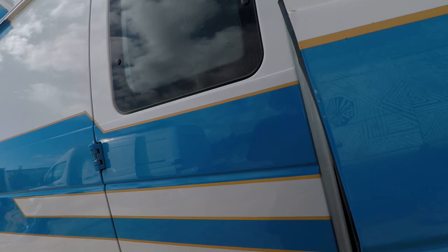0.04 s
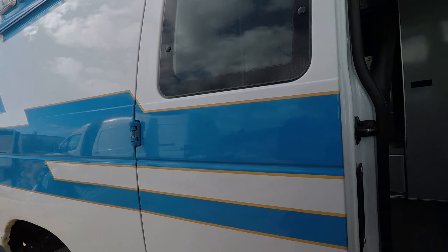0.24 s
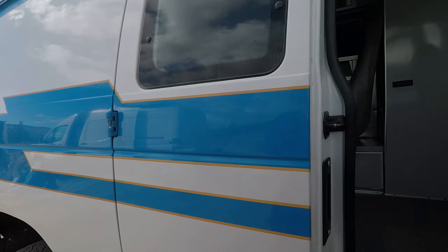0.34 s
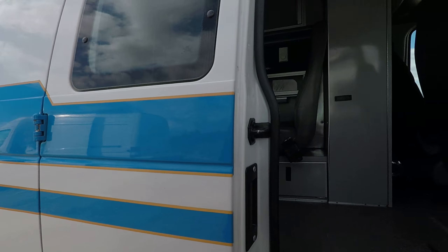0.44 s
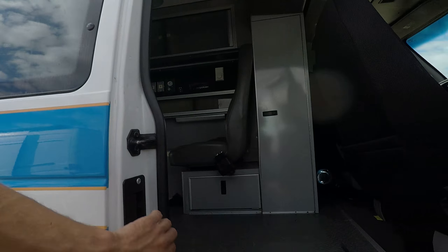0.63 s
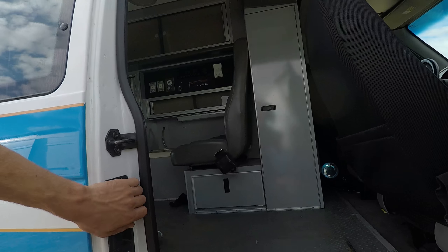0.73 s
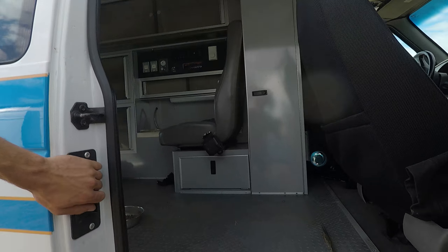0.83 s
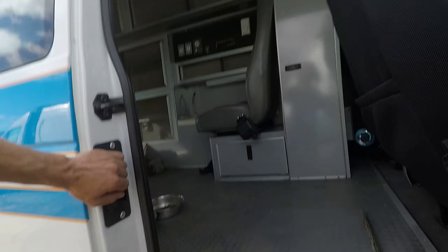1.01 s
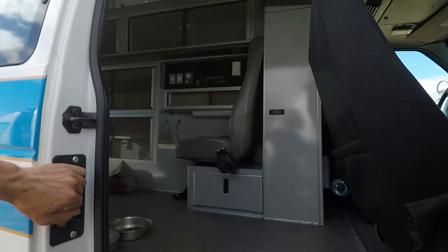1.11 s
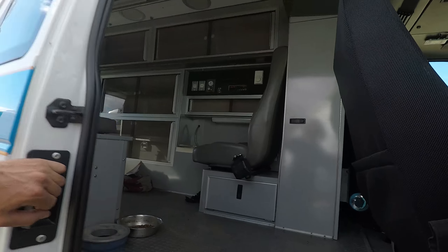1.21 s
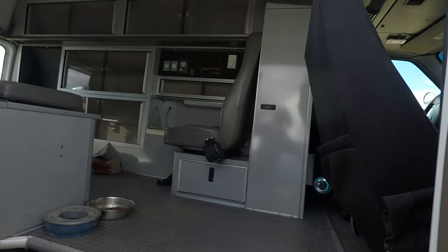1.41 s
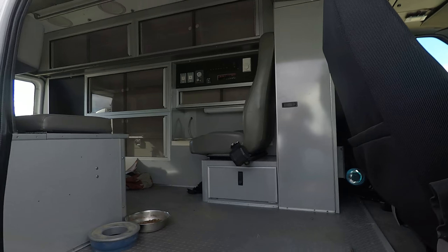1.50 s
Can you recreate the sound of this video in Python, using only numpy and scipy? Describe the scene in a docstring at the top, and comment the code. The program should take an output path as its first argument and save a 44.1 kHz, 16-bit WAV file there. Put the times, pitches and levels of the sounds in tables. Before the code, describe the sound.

Van side doors unlatched: a sharp metallic clack and boom, then a heavier latch clunk and hum

```python
"""Low outdoor rumble, a high hiss and small scrapes come first, with air puffing on the microphone.
Then the first of a van's twin side doors clacks and booms, heard from arm's length. A hand knocks and scrapes
at the handle of the second, whose latch lets go with a clunk that leaves the panel humming.
Metal and panels are decaying modes plus dense bands of noise; air and scrapes are coloured noise."""
import sys
import numpy as np
from scipy import signal
from scipy.fft import rfft, irfft
from scipy.io import wavfile

SR = 44100
rng = np.random.default_rng(int(sys.argv[2]) if len(sys.argv) > 2 else 0)


def int16_out(signal):
    """Quantize to a 16-bit WAV file."""
    q = np.round(np.clip(np.atleast_2d(signal).T, -1, 1) * 32767)
    wavfile.write(sys.argv[1], SR, q.astype(np.int16))


N = 68355
T = np.arange(N) / SR
TOP_HZ = 15000

# octave_db is the level in each octave band; relative_db scales the sounds it is applied to

# puffs of air on the microphone: peak_s, width_s, pitch_hz, level_db
PUFFS = [(0.102, 0.016, 38.4, -28), (0.223, 0.01, 45, -17), (0.565, 0.015, 35.8, -15),
         (0.674, 0.028, 47, -23), (0.817, 0.015, 37.4, -23.5), (0.924, 0.082, 42.2, -20),
         (1.009, 0.016, 71.3, -8), (1.033, 0.021, 33, -6.5), (1.037, 0.031, 118, -19),
         (1.076, 0.015, 23, -9)]
# outdoor rumble, spectrum: freq_hz, octave_db
OUTDOORS = [(22, -27.5), (40, -36), (80, -40), (170, -37.5), (320, -46.5), (640, -53), (1300, -56),
            (2300, -61.5), (3300, -69), (6000, -61), (10500, -60), (14000, -72)]
# outdoor rumble, gain over time: time_s, relative_db
OUTDOORS_LEVEL = [(0, 0.5), (.4, 1.5), (.6, -0.5), (.95, 2), (1.25, 1), (1.42, -8.5), (1.55, -1.5)]
# high hiss, spectrum: freq_hz, octave_db
HISS = [(400, -17), (1000, -24), (2000, -24), (2600, -9), (3450, -17.5), (4200, -8), (4750, 1.5),
        (5400, -0.5), (6100, 1), (6600, 1), (7300, -16.5), (8800, -5.5), (11200, -20), (12400, -10),
        (15000, -26)]
# high hiss, gain over time: time_s, relative_db
HISS_LEVEL = [(0, -46), (.07, -60), (.112, -44), (.15, -62), (.18, -64), (.22, -42), (.31, -50.5),
              (.35, -43), (.55, -46.5), (.63, -54.5), (1.02, -55), (1.09, -44.5), (1.2, -52.5), (1.27, -63),
              (1.32, -48.5), (1.4, -49), (1.55, -52)]
# thin whistle in the hiss as the first door swings; WHISTLE_HZ is its pitch at the start
WHISTLE_S, WHISTLE_LENGTH_S, WHISTLE_DB = 0.29, 0.31, -46
WHISTLE_HZ, WHISTLE_WIDTH_HZ, WHISTLE_GLIDE_HZ_PER_S = 6620, 560, -1000

# scrapes of hand and handle: start_s, length_s, relative_db
SCRAPES = [(0.004, 0.014, -45), (0.092, 0.042, -44.5), (0.73, 0.043, -47.5), (0.807, 0.0089, -44.5),
           (0.882, 0.064, -39.5), (1.039, 0.035, -32.5)]
# scrape spectrum: freq_hz, octave_db
SCRAPE_COLOUR = [(300, -2.5), (700, -4.5), (1300, -6.5), (2200, 1), (3300, -8.5), (5500, 5), (8000, -14),
                 (11000, -22), (14000, -17)]
SCRAPE_GRAINS_PER_S, SCRAPE_GRAIN_DB = 400, 3
# faint squeak of the handle's pivot
SQUEAK_S, SQUEAK_LENGTH_S, SQUEAK_HZ, SQUEAK_WIDTH_HZ, SQUEAK_DB = 0.715, 0.28, 1127, 310, -51.5
SQUEAK_CATCH_PER_S, SQUEAK_CATCH_DB = 60, 5
# loose steel parts under the scrapes; RATTLE_DB is relative to SCRAPES
RATTLE_PER_S, RATTLE_DB, RATTLE_SPREAD_DB, RATTLE_T60_S = 170, 15, 1, 0.017

# dull bumps of the bodywork: start_s, pitch_hz, level_db, t60_s
BUMPS = [(0.285, 255.9, -10, 0.3), (.585, 180, -25.5, 0.5), (.646, 189.3, -18, 0.15),
         (.646, 256.8, -27, 0.37), (0.644, 440, -29.5, 0.13), (0.743, 187.4, -20.5, 0.23),
         (.75, 409, -36, 0.21), (0.802, 124.4, -13, 0.12), (0.899, 113, -21.5, 0.12),
         (1.168, 255.7, -20.5, 0.16)]
BUMP_RISE_S = 0.0077
# light ticks of the handle and hinge: start_s, relative_db
TICKS = [(0.647, 2), (0.736, 3), (.755, -4), (0.788, -5.5), (0.84, -20), (0.963, -5), (1.312, -7.5),
         (1.343, -9.5)]
# dense ring of a tick: freq_hz, octave_db, t60_s
TICK_RING = [(397.5, -34.5, 0.2), (780, -49, 0.071), (1530, -37.5, 0.051), (3200, -62, 0.048),
             (5340, -46, 0.15), (11000, -83, 0.046)]
# modes of the handle, rung by every tick: pitch_hz, level_db, t60_s
HANDLE_MODES = [(995, -43.5, 0.069), (1232, -44, 0.065), (1430, -45.5, 0.045), (1680, -45, 0.056),
                (2110, -50, 0.066)]
# dull scuff of a foot: start_s, length_s, level_db
SCUFFS = [(0.065, 0.073, -38)]
SCUFF_HZ, SCUFF_WIDTH_HZ = 372, 200
# rustle as the second door swings out; SWING_DB scales its spectrum
SWING_S, SWING_LENGTH_S, SWING_DB = 1.29, 0.26, -56.5
# rustle spectrum: freq_hz, octave_db
SWING_COLOUR = [(150, -2), (400, 4.5), (900, 0), (2000, 2.5), (3400, -6.5), (5000, 3), (12000, -17)]

# modes of the first door's steel catch, shared by the loose parts: pitch_hz, level_db, t60_s
CATCH = [(4180, -25, 0.048), (5120, -22, 0.06), (5930, -30, 0.096), (6240, -19.5, 0.087),
         (6400, -29, 0.069), (6980, -32, 0.057), (7370, -27.5, 0.075), (8200, -36, 0.12),
         (8440, -37, 0.057)]
CATCH_DETUNE = 0.022  # largest pitch shift, as a fraction: each contact grips the catch elsewhere
# brief high metallic noise swelling into the first clacks; SWELL_IN_DB scales its bands
SWELL_IN_PEAK_S, SWELL_IN_DB, SWELL_IN_RISE_DB_PER_S, SWELL_IN_FALL_DB_PER_S = 0.2365, -8, 808, 2000
SWELL_IN_WIDTH_HZ, SWELL_IN_PITCH_HZ, SWELL_IN_FAVOUR_DB = 170, 6130, 1

# metal contacts of the first door: start_s, relative_db
FIRST_CLACKS = [(.2322, -6.5), (0.2352, 1), (.2425, -8), (.251, -13.5)]
# crack of each contact: freq_hz, octave_db, t60_s
FIRST_CRACK = [(290, -24.5, 0.037), (700, -21.5, 0.14), (2110, -18.5, 0.048), (2960, -15.5, 0.024),
               (5060, -20.5, 0.1), (7280, -11.5, 0.042), (10100, -35, 0.017), (13600, -18, 0.017)]
# blows on the panel, the jolt and its soft rebound on the seal: start_s, relative_db, push_s, lowpass_hz
FIRST_BLOWS = [(0.2372, -1, 0.0044, 12100), (0.3146, -7, 0.0011, 454)]
# modes of the panel: pitch_hz, level_db, t60_s
FIRST_PANEL = [(94.2, -14, 0.46), (133.8, -10, 0.72), (158.2, -7.5, 0.25), (172.6, -7.5, 0.42),
               (255, -15.5, 0.3), (316.3, -15.5, 0.25), (415, -21.5, 0.36), (437.5, -19, 0.43),
               (481, -21, 0.49), (553, -20.5, 0.41), (587.4, -32.5, 0.68), (626, -27, 0.34),
               (676, -35, 0.22), (779, -26, 0.46), (1203, -25.5, 0.22), (1500, -30.5, 0.26),
               (1825, -17, 0.081), (2090, -11.5, 0.05), (2265, -30, 0.18)]
# dense ring of the door: freq_hz, octave_db, t60_s
FIRST_BODY = [(70, -34, 0.29), (141, -26, 0.49), (294, -17, 0.51), (540, -16, 0.36), (1130, -26.5, 0.35),
              (2190, -23.5, 0.16), (3200, -36.5, 0.24), (6030, -28.5, 0.27), (11000, -59, 0.21)]

# metal contacts of the second door's latch: start_s, relative_db
LATCH_CLACKS = [(0.999, -13), (1.105, -9), (1.1097, 3), (1.1155, -0.5), (1.122, -6.5), (1.1445, -2),
                (1.151, -8), (1.173, -15), (1.2118, -24)]
# crack of each contact: freq_hz, octave_db, t60_s
LATCH_CRACK = [(296, -22, 0.046), (780, -24, 0.042), (2020, -39, 0.047), (3230, -39, 0.05),
               (4870, -27.5, 0.079), (6960, -30, 0.11), (8700, -37, 0.048), (11000, -56, .08),
               (14000, -54, .08)]
# blows on the second door, the hand, then the latch letting go: start_s, relative_db, push_s
SECOND_BLOWS = [(0.646, -30, 0.0017), (.739, -21, 0.0007), (.757, -28, 0.0055), (0.905, -29.5, 0.0029),
                (1.1066, 2, 0.0021), (1.142, -6, 0.0096), (1.172, -20, 0.0052)]
# modes of the panel: pitch_hz, level_db, t60_s
SECOND_PANEL = [(124.6, -13.5, 0.26), (149.3, -1.5, 0.23), (190.1, -6.5, 0.39), (266, -31, 0.1),
                (321.5, -16.5, 0.15), (379.4, -10, 0.13), (437, -29, 0.28), (707.6, -21, 0.11),
                (832.3, -20, 0.13), (1182, -22.5, 0.13), (1298, -34, 0.15), (1633, -46, 0.22),
                (1997, -28.5, 0.1)]
# dense ring of the door: freq_hz, octave_db, t60_s
SECOND_BODY = [(71, -24, 0.26), (152, -20.5, 0.72), (307, -16, 0.34), (560, -26.5, 0.32),
               (1180, -24.5, 0.21), (2400, -26, 0.16), (3250, -44, 0.12), (5900, -32, 0.15),
               (11000, -63, 0.19)]
# slow hum after the clunk, two beating modes: pitch_hz, level_db, t60_s
HUM = [(192.8, 8, 0.33), (178.2, 6.5, 0.29)]
HUM_S, HUM_RISE_S = 1.125, 0.12
# time a panel needs to get moving at SWELL_HZ, in inverse proportion to pitch
FIRST_SWELL_S, SECOND_SWELL_S, SWELL_HZ = 0.0021, 0.0037, 151

# the two microphone ports differ only in the top treble: freq_hz, side_minus_mid_db
PORTS = [(400, -88), (5000, -64), (8000, -55), (10500, -21), (12500, -3.5), (15000, 0)]
PORT_PHASE_RAD = 1.65


def amp(db):
    """Amplitude from decibels."""
    return 10 ** (np.asarray(db) / 20)


def along(table, hz, axis=1):
    """A column of a table by frequency, joined on a log axis."""
    rows = np.array(table, float)
    return np.interp(np.log(hz), np.log(rows[:, 0]), rows[:, axis])


def curve(table):
    """Gain over time from time_s, relative_db points."""
    time_s, level_db = np.array(table).T
    return amp(np.interp(T, time_s, level_db))


def noise(table):
    """Steady noise with the given level in each octave, cut below 18 Hz."""
    hz = np.maximum(np.fft.rfftfreq(N, 1 / SR), 1)
    per_octave = np.sqrt(SR / (2 * np.log(2) * hz))
    low_cut = np.sqrt(1 + (18 / hz) ** 8)
    gain = amp(along(table, hz)) * per_octave / low_cut
    return irfft(rfft(rng.standard_normal(N)) * gain, N)


def band(hz, width_hz):
    """Noise of rms 1 around one frequency."""
    gain = np.exp(-2 * ((np.fft.rfftfreq(N, 1 / SR) - hz) / width_hz) ** 2)
    y = irfft(rfft(rng.standard_normal(N)) * gain, N)
    return y / y.std()


def arch(start_s, length_s):
    """A rounded swell that begins and ends in silence."""
    progress = np.clip((T - start_s) / length_s, 0, 1)
    return np.sqrt(np.abs(np.sin(np.pi * progress)))


def flicker(rate_per_s, db):
    """A gain that wanders between random values, rate_per_s of them a second."""
    return amp(db * np.interp(T * rate_per_s, np.arange(N), rng.standard_normal(N)))


def fade(start_s, rise_s, t60_s):
    """Quick rise and exponential decay."""
    age_s = np.maximum(T - start_s, 0)
    rise = 1 - np.exp(-(age_s / rise_s) ** 2)
    return rise * np.exp(-np.log(1000) * age_s / t60_s)


def ring(modes, start_s, push_s, swell_s):
    """Modes set ringing by one blow; with swell, low ones build up more slowly."""
    out = np.zeros(N)
    for hz, db, t60_s in modes:
        envelope = fade(start_s, push_s + swell_s * SWELL_HZ / hz, t60_s)
        out += amp(db) * envelope * np.sin(2 * np.pi * hz * (T - start_s))
    return out


def dense(table, blows, swell_s):
    """Countless close modes: third-octave noise bands that each die away after every blow."""
    out = np.zeros(N)
    for hz in 62.5 * 2 ** (np.arange(25) / 3):
        if hz <= table[0][0] / 2:
            continue
        t60_s = along(table, hz, axis=2)
        power = np.zeros(N)
        for start_s, db, push_s in blows:
            power += (amp(db) * fade(start_s, push_s + swell_s * SWELL_HZ / hz, t60_s)) ** 2
        # a third of the octave's power in each band
        out += amp(along(table, hz)) * np.sqrt(power / 3) * band(hz, hz / 4)
    return out


def air():
    """Low puffs on the microphone, outdoor rumble and a wavering high hiss, for a while with a whistle."""
    puffs = np.zeros(N)
    for peak_s, width_s, hz, db in PUFFS:
        gust = np.exp(-((T - peak_s) / width_s) ** 2)
        puffs += amp(db) * gust * np.sin(2 * np.pi * hz * (T - peak_s))
    glide = np.exp(2j * np.pi * np.cumsum(WHISTLE_GLIDE_HZ_PER_S * (T - WHISTLE_S)) / SR)
    tone = np.real(signal.hilbert(band(WHISTLE_HZ, WHISTLE_WIDTH_HZ)) * glide)
    whistle = amp(WHISTLE_DB) * arch(WHISTLE_S, WHISTLE_LENGTH_S) * tone
    rumble = noise(OUTDOORS) * curve(OUTDOORS_LEVEL)
    hiss = noise(HISS) * curve(HISS_LEVEL)
    return puffs + rumble + hiss + whistle


def scrape_swells():
    """Strength of the hand's scraping over time."""
    return sum(amp(db) * arch(start_s, length_s) for start_s, length_s, db in SCRAPES)


def handle():
    """Short grainy scrapes and a faint rough squeak that keeps catching."""
    scrapes = noise(SCRAPE_COLOUR) * scrape_swells() / 2
    squeak = amp(SQUEAK_DB) * arch(SQUEAK_S, SQUEAK_LENGTH_S) * band(SQUEAK_HZ, SQUEAK_WIDTH_HZ)
    grainy_scrapes = scrapes * flicker(SCRAPE_GRAINS_PER_S, SCRAPE_GRAIN_DB)
    return grainy_scrapes + squeak * flicker(SQUEAK_CATCH_PER_S, SQUEAK_CATCH_DB)


def rattle():
    """Loose steel parts tick at random while the hand works the handle, ringing at the catch's pitches."""
    chance, size, sign = rng.random(N), rng.standard_normal(N), rng.choice([-1, 1], N)
    strength = amp(RATTLE_DB + RATTLE_SPREAD_DB * size) * scrape_swells()
    ticks = (chance < RATTLE_PER_S / SR) * sign * strength
    short_modes = [(hz, db, RATTLE_T60_S) for hz, db, _ in CATCH]
    return signal.fftconvolve(ticks, ring(short_modes, 0, 1 / SR, 0))[:N]


def small_sounds(contact_s=0.0012):
    """A scuffing foot, dull bumps and light ticks that ring, and the rustle of the swinging door."""
    bumps = sum(ring([(hz, db, t60_s)], start_s, BUMP_RISE_S, 0) for start_s, hz, db, t60_s in BUMPS)
    ticks = dense(TICK_RING, [(start_s, db, contact_s) for start_s, db in TICKS], 0)
    for start_s, db in TICKS:
        ticks += amp(db) * ring(HANDLE_MODES, start_s, contact_s, 0)
    scuff_swells = sum(amp(db) * arch(start_s, length_s) for start_s, length_s, db in SCUFFS)
    scuffs = band(SCUFF_HZ, SCUFF_WIDTH_HZ) * scuff_swells
    rustle = amp(SWING_DB) * arch(SWING_S, SWING_LENGTH_S) * noise(SWING_COLOUR)
    return bumps + ticks + scuffs + rustle


def onset_swell():
    """Brief high metallic noise, narrow bands at the catch's pitches, swelling into the first clacks."""
    rise_db = SWELL_IN_RISE_DB_PER_S * (T - SWELL_IN_PEAK_S)
    fall_db = SWELL_IN_FALL_DB_PER_S * (SWELL_IN_PEAK_S - T)
    bands = np.zeros(N)
    for hz, db, _ in CATCH:
        # bands near SWELL_IN_PITCH_HZ are a little louder
        distance = (hz - SWELL_IN_PITCH_HZ) / (2 * SWELL_IN_WIDTH_HZ)
        favour_db = SWELL_IN_FAVOUR_DB * np.exp(-distance ** 2)
        bands += amp(db + favour_db) * band(hz, SWELL_IN_WIDTH_HZ)
    return amp(SWELL_IN_DB + np.minimum(rise_db, fall_db)) * bands


def first_door(contact_s=0.0009, catch_s=0.0042):
    """The steel catch clacks several times and the panel booms, late as neighbour modes start opposed."""
    out = dense(FIRST_CRACK, [(start_s, db, contact_s) for start_s, db in FIRST_CLACKS], 0)
    grips = rng.uniform(-0.94, 1, (len(FIRST_CLACKS), len(CATCH)))
    for (start_s, db), grip in zip(FIRST_CLACKS, grips):
        gripped = []
        for (hz, level_db, t60_s), g in zip(CATCH, grip):
            gripped.append((hz * (1 + CATCH_DETUNE * g), level_db, t60_s))
        out += amp(db) * ring(gripped, start_s, catch_s, 0)
    for start_s, db, push_s, lowpass_hz in FIRST_BLOWS:
        boom = dense(FIRST_BODY, [(start_s, 0, push_s)], FIRST_SWELL_S)
        for k, mode in enumerate(FIRST_PANEL):
            boom += (-1) ** k * ring([mode], start_s, push_s, FIRST_SWELL_S)
        lowpass = signal.butter(2, lowpass_hz, fs=SR, output="sos")
        out += amp(db) * signal.sosfilt(lowpass, boom)
    return out


def second_door(contact_s=0.00082):
    """Soft knocks of the hand, then the latch snaps free with a run of clacks and the panel hums on."""
    clacks = dense(LATCH_CRACK, [(start_s, db, contact_s) for start_s, db in LATCH_CLACKS], 0)
    panel = np.zeros(N)
    for start_s, db, push_s in SECOND_BLOWS:
        panel += amp(db) * ring(SECOND_PANEL, start_s, push_s, SECOND_SWELL_S)
    hum = ring(HUM, HUM_S, HUM_RISE_S, 0)
    return clacks + panel + hum + dense(SECOND_BODY, SECOND_BLOWS, SECOND_SWELL_S)


def scene():
    """Everything is heard in the centre; only the top treble spreads."""
    doors = onset_swell() + first_door() + second_door()
    mid = doors + handle() + rattle() + small_sounds() + air()
    hz = np.maximum(np.fft.rfftfreq(N, 1 / SR), 1)
    side = irfft(rfft(mid) * amp(along(PORTS, hz)) * np.exp(1j * PORT_PHASE_RAD), N)
    return np.array([mid + side, mid - side])


def record(dry):
    """The recorder rounds the highest peaks and cuts the top."""
    rounded = dry / (1 + np.abs(dry) ** 6) ** (1 / 6)
    top_cut = signal.ellip(8, 0.2, 80, TOP_HZ, fs=SR, output="sos")
    return signal.sosfilt(top_cut, rounded)


dry = scene()
out = record(dry)
int16_out(out)
```